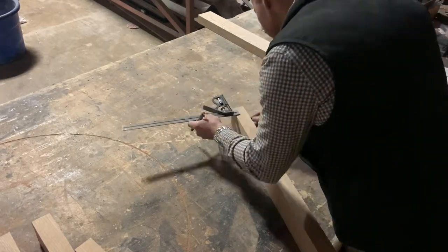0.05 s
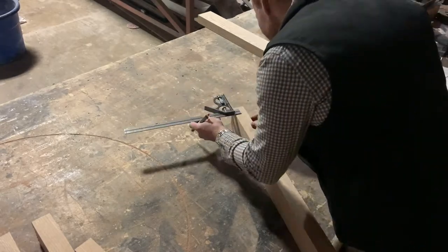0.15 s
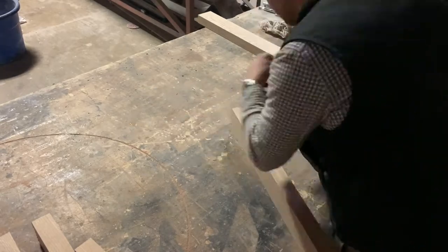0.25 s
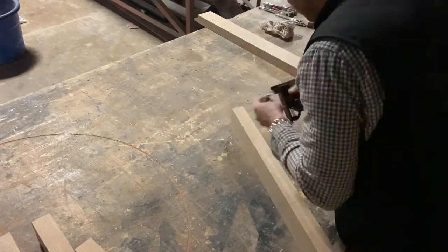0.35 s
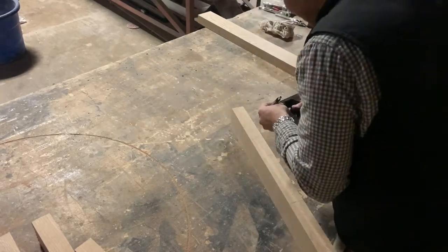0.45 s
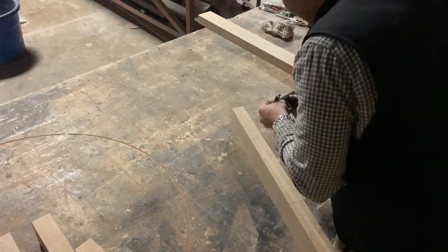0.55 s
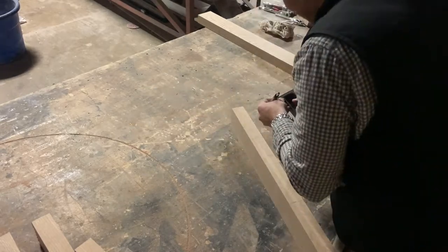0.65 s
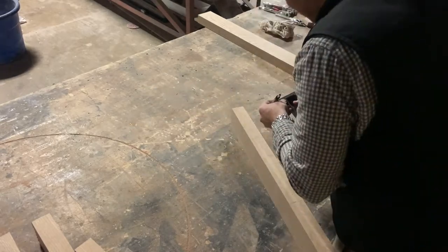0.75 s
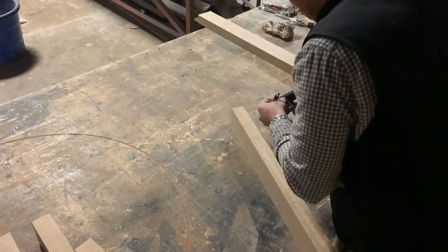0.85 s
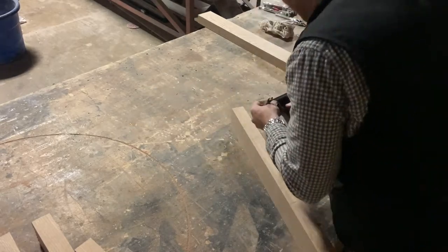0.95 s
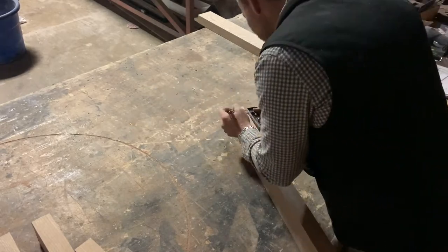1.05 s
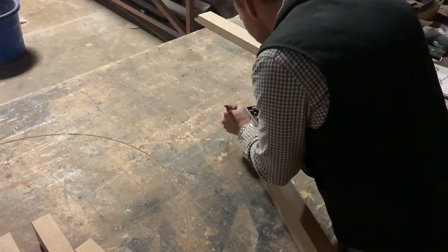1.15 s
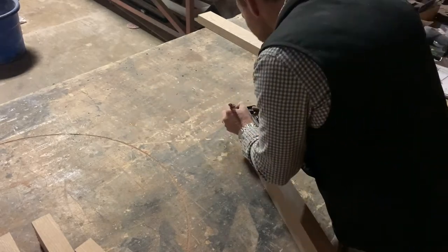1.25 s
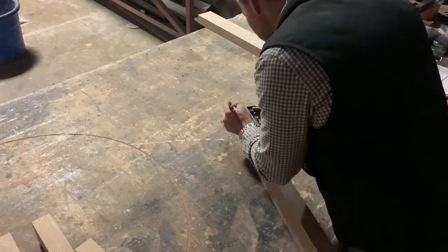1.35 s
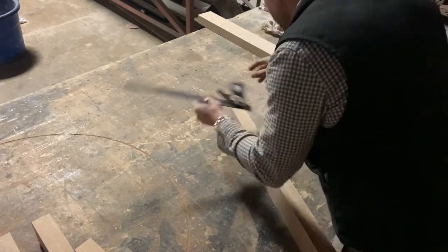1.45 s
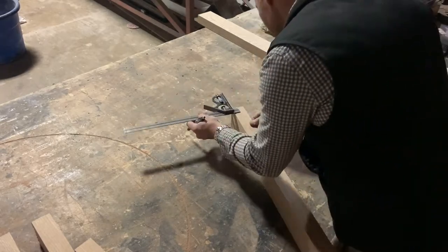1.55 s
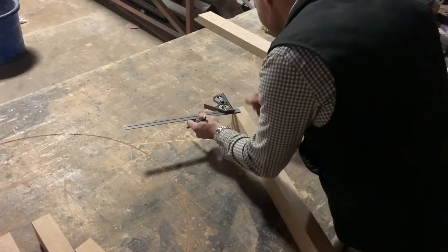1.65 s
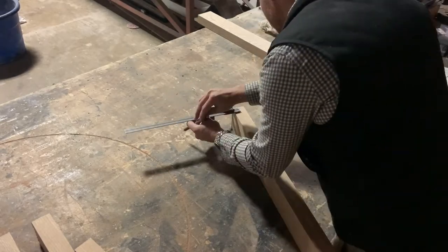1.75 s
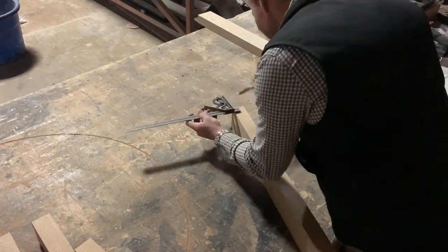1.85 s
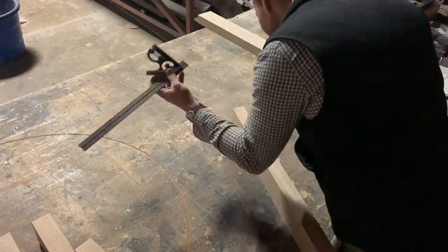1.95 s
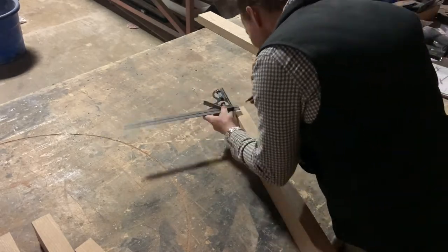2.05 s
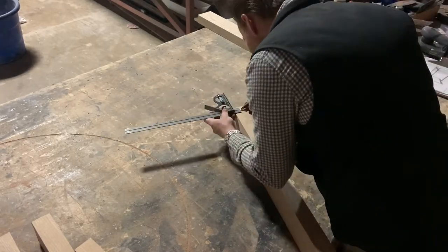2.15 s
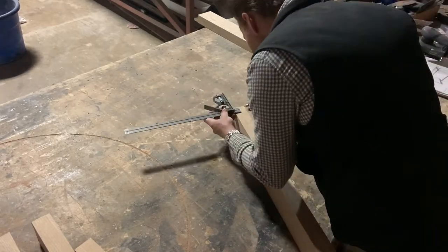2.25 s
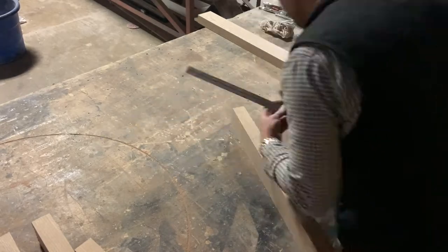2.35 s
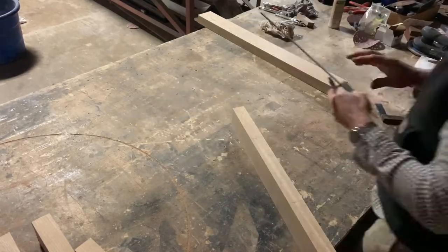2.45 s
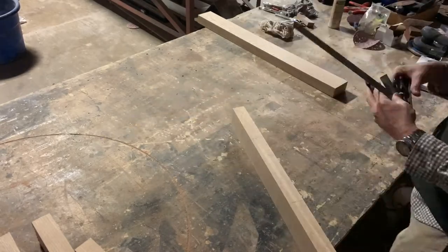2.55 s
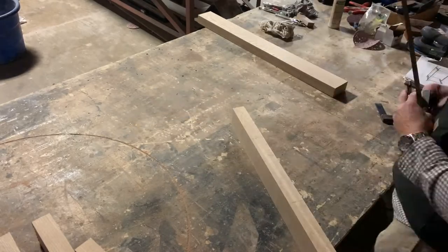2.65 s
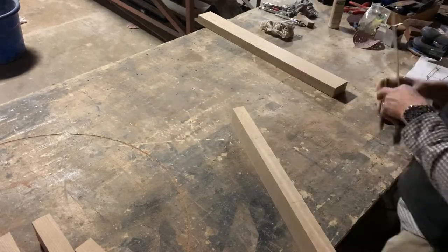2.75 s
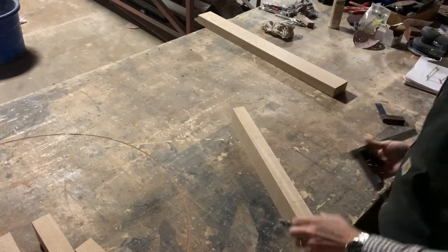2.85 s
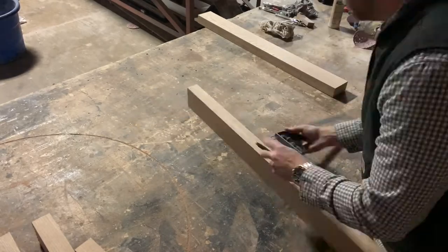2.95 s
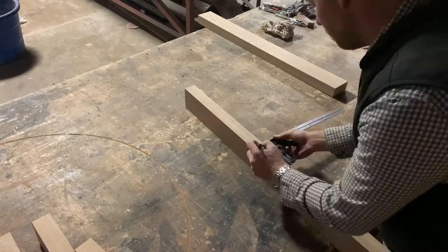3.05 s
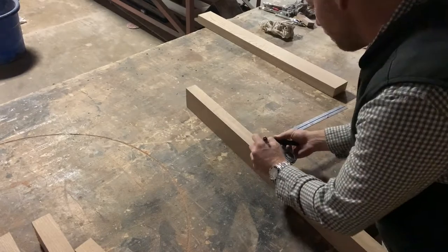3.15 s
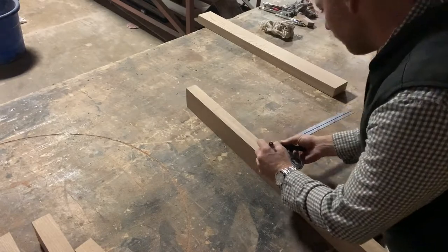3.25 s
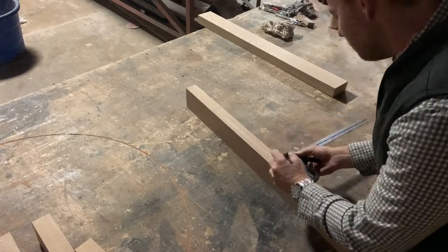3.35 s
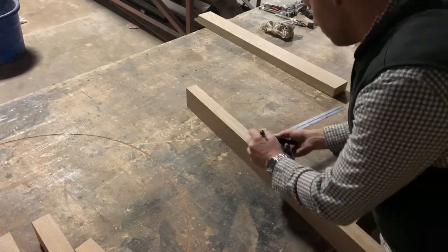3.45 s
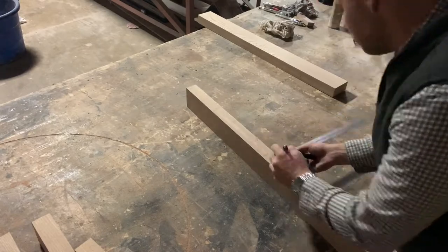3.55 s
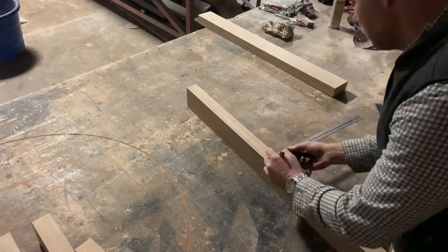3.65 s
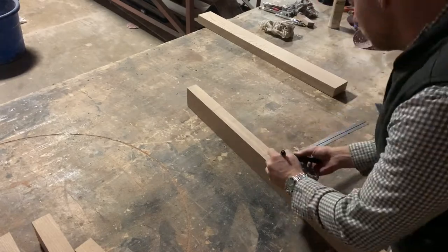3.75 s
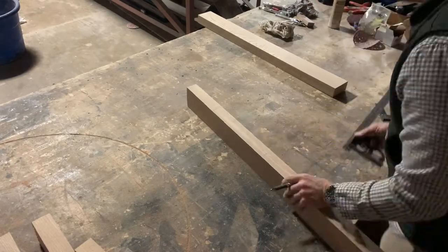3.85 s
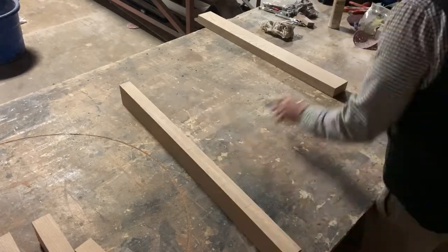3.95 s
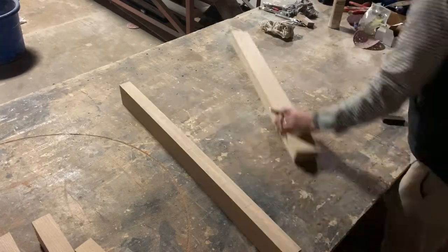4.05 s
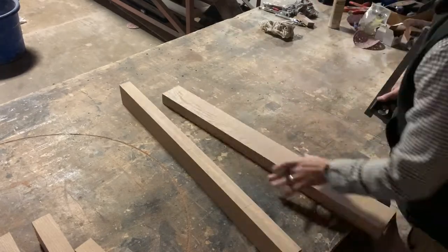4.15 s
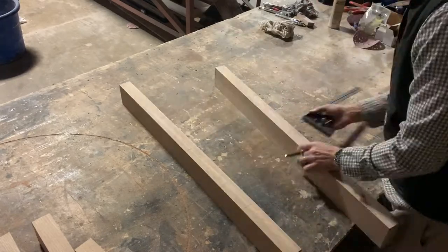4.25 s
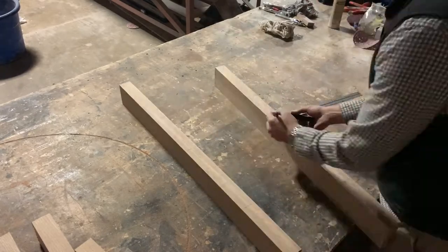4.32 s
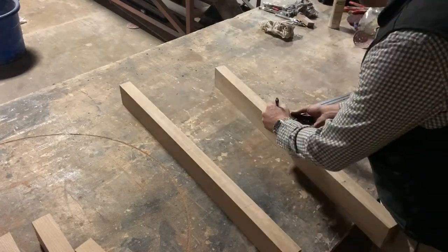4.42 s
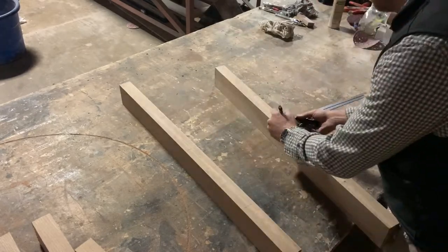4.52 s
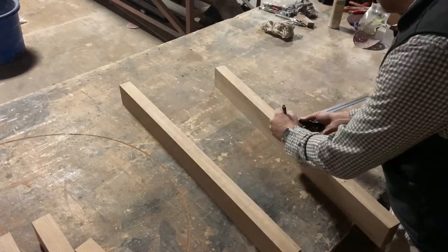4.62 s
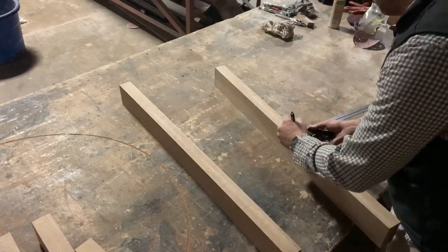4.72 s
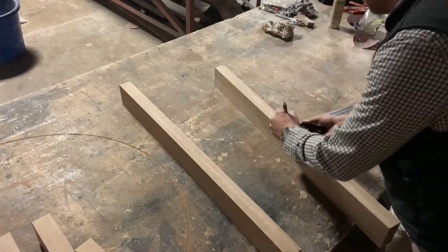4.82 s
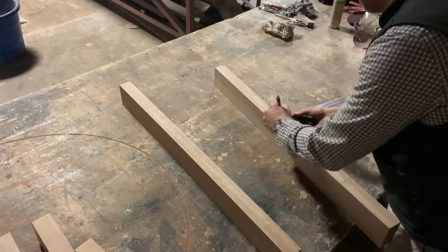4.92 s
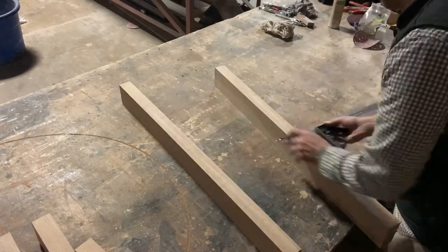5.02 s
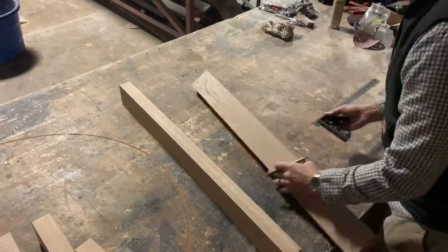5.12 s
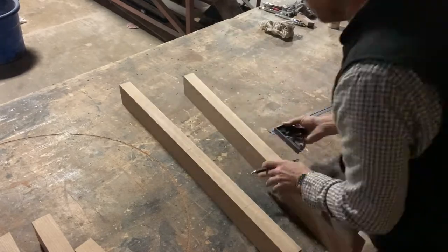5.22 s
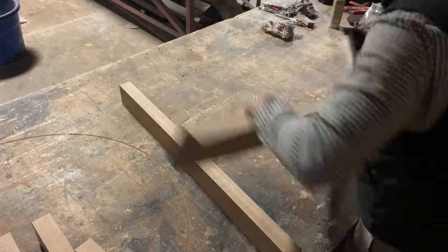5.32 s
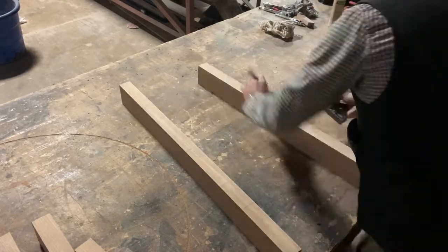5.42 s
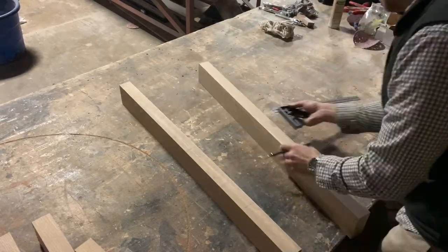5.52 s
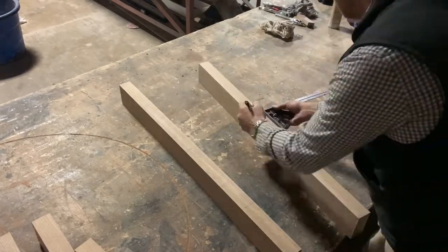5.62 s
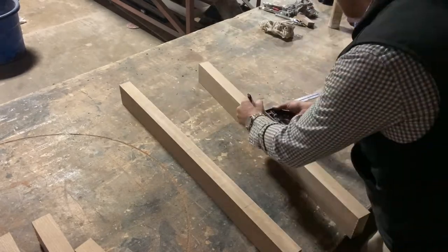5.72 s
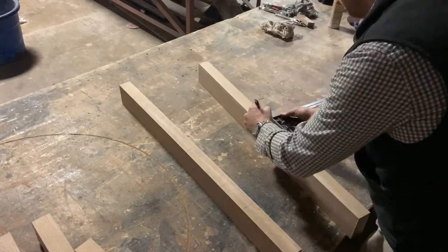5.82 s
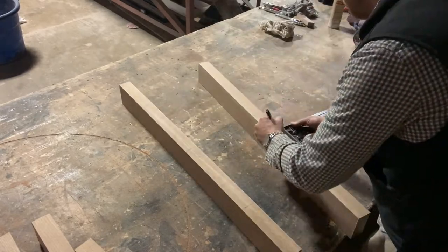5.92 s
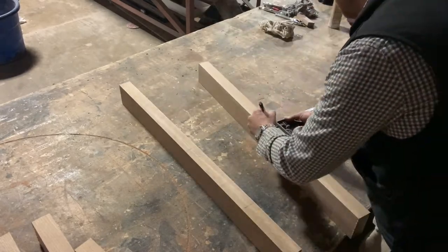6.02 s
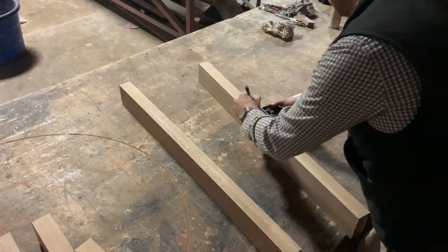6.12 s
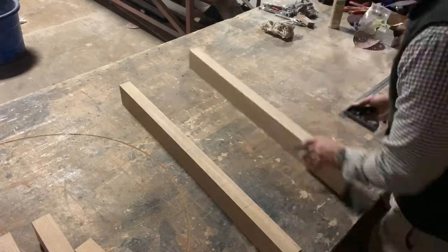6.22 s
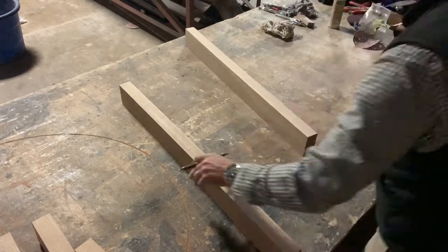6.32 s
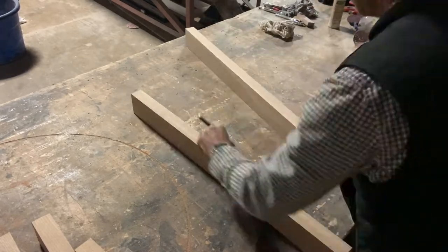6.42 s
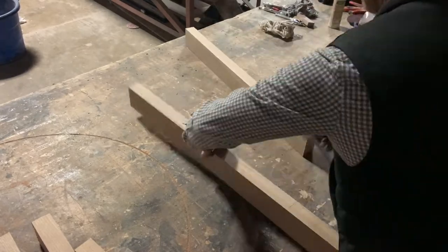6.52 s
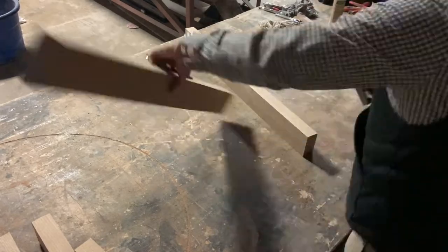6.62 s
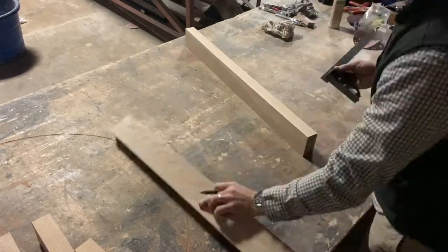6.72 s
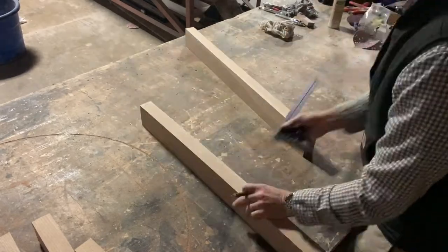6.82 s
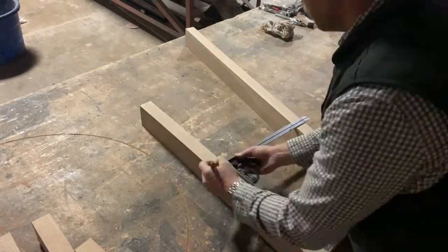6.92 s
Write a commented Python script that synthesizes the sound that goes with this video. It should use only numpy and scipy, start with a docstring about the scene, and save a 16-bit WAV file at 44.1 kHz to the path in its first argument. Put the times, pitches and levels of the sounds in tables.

```python
"""Far machines hum throughout in a large shop. At a workbench a steel square ticks, and ticks again more
sharply after a second. Near two seconds a distant motor whines up twice and runs down, while the square
starts to slide along an edge, singing by friction. From three seconds on boards are dragged, rasping
over grit, and from four they are knocked down in clusters, each impact ringing the modes of the wood,
with more ticks and slides of the square between."""
import sys
import numpy as np
from scipy import signal
from scipy.fft import rfft, irfft, next_fast_len
from scipy.io import wavfile

SR = 44100
rng = np.random.default_rng(int(sys.argv[2]) if len(sys.argv) > 2 else 0)


def dump_mix(stems):
    """Bounce the given channels to the path in sys.argv[1] as a 16-bit WAV at rate SR."""
    frames = np.atleast_2d(stems).T  # one column per channel
    limited = np.clip(frames, -1, 1)  # hard clip at full scale
    pcm = np.round(limited * 32767).astype(np.int16)
    wavfile.write(sys.argv[1], SR, pcm)


N = 307818

# Noise of far machines. Each row: frequency in Hz, relative spectral density in dB.
MACHINE_SPECTRUM = [(76, -75), (130, -59.5), (227, -26.5), (351, -12.5), (464, -5.5), (637, 1.5),
                    (690, 1.5), (911, -3), (967, -7.5), (1180, -8.5), (1720, -12.5), (1980, -16.5),
                    (2510, -19.5), (3380, -22.5), (15000, -55.5)]
# Coherence of that noise. Each row: frequency in Hz, left-right correlation.
COHERENCE = [(60, 0.84), (180, 0.47), (550, 0.9), (1650, 0.8), (4970, 0.12), (15000, -0.59)]
# Machine hum. Each row: frequency in Hz, level in dB.
HUM_LINES = [(190, -87), (237, -79), (281, -79), (329, -77), (421, -76), (469, -67), (668, -67), (959, -63),
             (1104, -76), (1377, -77), (1690, -72)]
# Frequencies in Hz at which the spectrum of an impact is given.
IMPACT_HZ = [800, 2500, 6000, 9000, 13000]
# Ticks of the square. Each row: start in seconds, level at 6 kHz in dB, then thud (800 Hz),
# ring (9 kHz) and snap (13 kHz) in dB relative to it.
SQUARE_TICKS = [(0.053, -59, 14, -3, 15), (0.0711, -40.5, 7, -9, -20), (1.051, -36, 0.5, 0.5, -18),
                (1.0727, -42, -10, -10, -25), (1.158, -55, -15, -19, -20), (1.26, -71, -15, 4, 0),
                (1.499, -42, 10, 3, -4), (1.835, -59.5, 16.5, -13, -12), (1.8971, -29, 2, 11, -19),
                (2.0038, -43, 0, 2.5, 4), (2.0768, -49, 9.5, 8.5, -9), (2.2062, -52.5, 0, 10.5, -40),
                (2.7804, -53, -4, -8, -19), (2.812, -55, 2, -4, 5), (3.0114, -31.5, -10, -22, -2),
                (3.487, -52, -4, -13, -8), (3.6175, -28.5, -14.5, -4.5, 2), (3.6237, -23.5, -9.5, -22, 2),
                (3.6612, -42.5, -12, -10, -8), (4.0415, -40.5, 0, 6, 16), (4.294, -47, 8, -6, -18),
                (4.3, -31.5, -12, -29, -25), (4.333, -53.5, 5.5, 0, -17), (4.4204, -60, 2, -12, -18),
                (4.47, -61.5, 2, -12.5, -6), (4.5962, -50, -3, -24, -22), (5.0426, -63.5, 8.5, 3, 4),
                (5.5626, -43.5, 6, -13, -14), (5.5871, -41.5, -5, -9, -4), (6.3511, -55, -6, 9, 2),
                (6.512, -66, -10, 1, 17), (6.883, -63, -12, 4, 14), (6.905, -69, -10, -2, 12)]
# Modes of the steel. Each row: frequency in Hz, level in dB, 60 dB decay time in seconds.
STEEL_MODES = [(2070, -4, .012), (2600, -4, .01), (3600, -3, .015), (5050, 1, .012), (5400, 0, .01),
               (7200, -4, .008), (8600, 2, .012), (9450, 1, .012), (9850, -2, .01), (13300, -4, .006),
               (14600, -4, .006)]
# Boards striking the bench; the light first row is heard as a tick. Each row: start in seconds,
# level at 800 Hz in dB, then middle (2.5 kHz) and treble in dB relative to it.
BOARD_KNOCKS = [(1.027, -32.5, 0.5, -2), (3, -46.5, 7, 0), (3.886, -24.5, -19, -24),
                (4.095, -12.5, -3.5, -14), (4.122, -14.5, 4.5, 7), (4.212, -28, -25, -14),
                (4.231, -15, -7, -13.5), (5.082, -9.5, 2.5, 2.5), (5.156, -13.5, -4.5, -8),
                (5.376, -24, -27.5, -26.5), (5.405, -7, 0, 0), (5.493, -29, -7.5, -10.5),
                (5.511, -21, -3.5, -31), (6.231, -16, -14.5, -27.5), (6.37, -23.5, -22.5, -29),
                (6.541, -40, -21, -21), (6.573, -34, -7.5, -22), (6.597, -25, -16, -26),
                (6.61, -34, -10.5, -20), (6.696, -17.5, -7, -11), (6.709, -11.5, -6.5, -17),
                (6.717, -22, -13, -14), (6.741, -6, -13, -1.5), (6.807, -8.5, -11.5, -18.5),
                (6.889, -38.5, -4, -2)]
# Offsets in dB to a knock's treble at 6, 9 and 13 kHz.
KNOCK_TREBLE_DB = [0.5, 1, -7]
# Modes of a board. Each row: frequency in Hz, level in dB, 60 dB decay time in seconds.
WOOD_MODES = [(503.6, -13, 0.01), (665, -4, 0.09), (829, 7, 0.033), (913, -1.5, 0.037), (1122, -5.5, 0.026),
              (1347, -1, 0.013), (1836, -0.5, 0.024), (2300, -2, 0.013), (2660, -2.5, 0.0078),
              (3090, -2.5, .02), (3433, -6.5, .02), (3693, -3, 0.012)]
# The motor's two runs. Each row: time in seconds, shaft speed in Hz, whine level in dB.
FIRST_RUN = [(1.84, 84.3, -47), (1.886, 88.8, -38.5), (1.94, 98, -52.5), (2.0, 105.9, -42.5),
             (2.136, 129.2, -53.5), (2.19, 132.4, -49)]
SECOND_RUN = [(2.17, 109.7, -49.5), (2.22, 114.2, -40.5), (2.302, 119.3, -45.5), (2.374, 131.3, -39.5),
              (2.434, 131.9, -45.5), (2.5, 134.2, -41.5), (2.698, 146.5, -50), (2.8, 137, -46),
              (2.844, 124.4, -52), (2.91, 100, -51)]
# Further shaft harmonics. Each row: order, dB relative to order 8 at full speed, dB lost per Hz slower.
SHAFT_HARMONICS = [(3, 7, 1), (5, -2.5, 0.24), (6, -13.5, 0), (13, -27, 0.5), (16, -28.5, 0)]
# The square sliding. Each row: peak time, rise and fall in seconds, then levels in dB of the
# high song (9.8 kHz), low song (5.3 kHz) and rustle.
SQUARE_SLIDES = [(1.872, 0.015, 0.015, -76, -75, -64), (2.42, 0.071, .04, -93, -72.5, -71.5),
                 (2.52, 0.044, 0.06, -94, -76.5, -71), (2.61, 0.032, 0.063, -81, -68.5, -71.5),
                 (3.17, 0.056, .1, -91, -77, -82), (3.31, 0.12, 0.083, -93, -72, -75.5),
                 (3.43, .05, 0.087, -95, -68, -70.5), (3.49, 0.033, 0.033, -89, -66, -61.5),
                 (3.55, .06, 0.037, -88, -62, -66), (3.74, 0.034, 0.037, -84, -68, -79),
                 (3.806, .02, 0.037, -90, -76, -61), (4.088, 0.04, 0.023, -44, -41, -56),
                 (4.35, .02, 0.036, -74, -82, -90), (4.48, .06, .1, -75, -75, -84.5),
                 (4.66, .1, 0.073, -71, -70.5, -91), (4.726, .01, .03, -89, -85, -83.5),
                 (4.87, 0.14, 0.07, -76, -73.5, -85), (4.95, 0.071, .1, -70, -66, -88.5),
                 (5.84, 0.12, 0.11, -70, -83.5, -91), (6.065, 0.11, .09, -70.5, -78, -88),
                 (6.5, 0.044, .03, -74, -68.5, -72), (6.915, 0.029, 0.034, -78.5, -66.5, -69.5)]
# Boards dragged. Each row: peak time, rise and fall in seconds, then rumble, rasp and hiss in dB.
BOARD_DRAGS = [(2.928, 0.039, 0.04, -39, -46, -44), (3.91, 0.047, 0.047, -30.5, -49.5, -42),
               (4.04, 0.028, 0.068, -28, -43, -46), (4.09, 0.046, 0.04, -26.5, -38, -37),
               (4.222, .04, 0.018, -36.5, -50.5, -50), (4.3, 0.028, .025, -59.5, -47, -57.5),
               (5.3, .055, 0.074, -32.5, -43, -46.5), (5.35, .04, .05, -33, -50, -52),
               (5.384, .025, 0.017, -31.5, -63.5, -57), (5.505, .035, 0.047, -39, -43.5, -52),
               (6.245, .045, 0.045, -29.5, -37.5, -39.5), (6.378, 0.023, 0.033, -33, -53, -44.5),
               (6.545, .015, 0.03, -44.5, -62, -61.5), (6.595, 0.032, 0.027, -30.5, -47, -43),
               (6.885, 0.025, 0.035, -55, -51.5, -60)]
# Contact noise of a drag. Each row: frequency in Hz, relative spectral density in dB.
CONTACT_SPECTRUM = [(240, -47), (400, -16.5), (777, 10), (1930, -31.5), (3750, -15.5), (4310, -24.5),
                    (5960, -14), (9610, -6), (16000, -33.5)]
# A drag shakes the square: high song, low song and rustle in dB relative to the drag's hiss column.
SHAKEN_DB = [-13, -16, -8.5]
# Wood sticking and slipping. Each row: peak time, rise and fall in seconds, level in dB.
WOOD_SQUEAKS = [(3.917, .03, .03, -52.5), (5.312, .03, .05, -48.5), (5.35, .05, 0.043, -51.5)]
# Reverberation. Each row: frequency in Hz, 60 dB decay time in seconds, energy in dB, side re mid in dB.
ROOM_DECAY = [(300, 0.74, -33.5, -2.5), (780, 0.17, -14, -13.5), (2570, 0.13, -11.5, -7.5),
              (5800, 0.27, -25, 6.5), (14000, 0.28, -24, 0.5)]
# Phase between the microphone's ports. Each row: frequency in Hz, lead of the left in radians.
PORT_LEAD = [(0, 0), (3530, 0.47), (5860, 1.48), (7920, 1.08), (11200, 1.3), (11700, -2.5), (13900, 1.8),
             (16500, 1)]
# Response of the microphone in its housing. Each row: frequency in Hz, gain in dB.
MIC_RESPONSE = [(150, -39), (300, -27.5), (500, -7), (3600, -0.5), (4300, -2.5), (5200, -0.5), (7900, -2.5),
                (8700, 1), (9200, 3), (9700, 0), (11000, -5), (13300, -3), (14700, -5), (15300, -1.5),
                (16500, -14.5)]

FULL_SPEED_HZ, CUTOFF_HZ = 146, 16900
MACHINES_DB, SWAY_DB, HISS_DB = -56, -2, -85


def amp(db):
    """Decibels express an amplitude ratio logarithmically."""
    return 10 ** (np.asarray(db) / 20)


def rms_one(x):
    """Normalisation to unit mean power."""
    return x / np.sqrt(np.mean(x ** 2) + 1e-20)


def at_hz(points, hz, column=1):
    """Interpolation of a spectrum table over log frequency."""
    points = np.array(points)
    return np.interp(np.log(hz), np.log(points[:, 0]), points[:, column])


def drift(rate_hz):
    """Low-passed noise gives a slow random modulation of unit spread."""
    r = np.exp(-80 * np.pi * rate_hz / SR)
    slow = signal.lfilter([1], [1, -2 * r, r * r], rng.standard_normal(N // 40 + 2002))[2000:]
    return np.interp(np.arange(N) / 40, np.arange(len(slow)), rms_one(slow))


def ring(x, hz, t60):
    """A damped resonator answers each impulse with a decaying sine."""
    r, w = amp(-60 / (t60 * SR)), 2 * np.pi * hz / SR
    return signal.lfilter([0, np.sin(w)], [1, -2 * r * np.cos(w), r * r], x + 1e-18)


def bands(x, low_hz=100):
    """A half-octave filter bank yields centres and bands; alternating signs smooth their sum."""
    edges = 50 * 2 ** np.arange(0, 8.6, .5)
    edges = edges[edges >= low_hz]
    for k, (low, high) in enumerate(zip(edges, edges[1:])):
        sos = signal.butter(2, [low, high], "band", fs=SR, output="sos")
        yield np.sqrt(low * high), (-1) ** k * signal.sosfilt(sos, x)


def far_machines():
    """Distant machines form a partly coherent noise field, with narrow hum resonances and faint hiss."""
    noise, common_drift, size = 0, drift(1.8), next_fast_len(N)
    colour = amp(at_hz(MACHINE_SPECTRUM, np.linspace(1, SR / 2, size // 2 + 1)))
    white = rng.standard_normal((2, size))
    for hz, (mid, side) in bands(irfft(rfft(white) * colour, size)[:, :N]):
        alike = np.clip(at_hz(COHERENCE, hz), -.5, 1)
        gain = amp(.6 * common_drift + .7 * drift(10))
        noise += gain * (np.sqrt(1 + alike) * mid + np.sqrt(1 - alike) * side * [[1], [-1]])
    hum = sum(amp(db) * rms_one(ring(white[k % 2, :N], hz, t60=.6))
              for k, (hz, db) in enumerate(HUM_LINES))
    hum = signal.sosfilt(signal.butter(4, 170, "high", fs=SR, output="sos"), hum)
    hiss = signal.sosfilt(signal.butter(3, [6000, 14500], "band", fs=SR, output="sos"), white[:, :N])
    return amp(MACHINES_DB + SWAY_DB * drift(.6)) * rms_one(noise) + hum + amp(HISS_DB) * rms_one(hiss)


def impacts(times, band_db, modes, ring_db, snap_db, crack_db, crack_t60):
    """An impulse excites every mode at a random strength, with a brief snap and longer crack of noise."""
    starts, out = np.round(times * SR).astype(int), np.zeros(N)
    scatter_db = 3.5 * rng.standard_normal((len(starts), len(modes)))
    lag = lambda hz: int(1.2 * SR / hz)   # lows build up about a cycle after the treble
    colour = lambda hz: np.array([np.interp(np.log(hz), np.log(IMPACT_HZ), row) for row in band_db])
    for k, (hz, mode_db, t60) in enumerate(modes):
        clicks = np.zeros(N)
        clicks[starts + lag(hz)] = amp(colour(hz) + mode_db + ring_db + scatter_db[:, k]) * (-1) ** k
        out += ring(clicks, hz, t60)
    for hz, noise in bands(rng.standard_normal(N), low_hz=390):
        clicks = np.full(N, 1e-18)
        clicks[starts + lag(hz)] = amp(colour(hz))
        decay = lambda t60: signal.lfilter([1], [1, -amp(-60 / (t60 * SR))], clicks)
        snap = amp(snap_db) * decay(0.0023 + 1.5 / hz)
        crack = amp(crack_db) * decay(crack_t60 * (1000 / hz) ** 0.18)   # lows last longer
        out += (snap + crack) * rms_one(noise)
    return out


def square_ticks():
    """Light contacts set the square's head and blade in brief, high free vibration."""
    times, db, thud, high, top = np.transpose(SQUARE_TICKS)
    middle = thud - 6.5
    band_db = db[:, None] + np.c_[thud, middle, np.zeros_like(db), high, top]
    return impacts(times, band_db, STEEL_MODES, ring_db=-7.5, snap_db=-10, crack_db=-12.5, crack_t60=.045)


def board_knocks():
    """Impact on the bench excites a board's strongly damped modes."""
    times, db, middle, treble = np.transpose(BOARD_KNOCKS)
    band_db = db[:, None] + np.c_[np.zeros_like(db), middle, treble[:, None] + KNOCK_TREBLE_DB]
    return impacts(times, band_db, WOOD_MODES, ring_db=-7.5, snap_db=-6, crack_db=-17.5, crack_t60=.078)


def in_time(rows, outside=-150.):
    """Linear interpolation gives a run's shaft speed and level at every sample."""
    times, *columns = np.transpose(rows)
    return [np.interp(np.arange(N) / SR, times, column, outside, outside) for column in columns]


def motor():
    """A rotor radiates harmonics of its shaft speed; the long way through the shop makes each flutter."""
    def harmonic(shaft_hz, level_db, order):
        gain = signal.lfilter([.002], [1, -.998], amp(level_db + 5.5 * drift(35)))   # soft start and stop
        turns = np.cumsum(np.maximum(shaft_hz, 0) * (1 + 0.00733 * drift(42))) / SR
        return gain * np.sin(2 * np.pi * order * turns)
    first = harmonic(*in_time(FIRST_RUN), order=8)
    hz, whine_db = in_time(SECOND_RUN)
    second = harmonic(hz, whine_db, order=8)
    for order, db, loss in SHAFT_HARMONICS:
        second += harmonic(hz, whine_db + db - loss * (FULL_SPEED_HZ - hz), order)
    return first + second


def strokes(rows, fade_db=26.5, arch_power=1.52):
    """Amplitude envelopes of rubbing: arches, fade_db down one rise before and one fall after the peak."""
    t, out = np.arange(N) / SR, np.zeros((len(rows[0]) - 3, N))
    for peak, rise, fall, *levels in rows:
        span = slice(int((peak - 1.6 * rise) * SR), int((peak + 1.6 * fall) * SR))
        away = np.where(t[span] < peak, (peak - t[span]) / rise, (t[span] - peak) / fall)
        out[:, span] += amp(np.array(levels)[:, None] - fade_db * away ** arch_power)
    return out


def grit(per_s, spread_db):
    """Sliding friction is a dense random train of unequal micro-impacts."""
    sizes = amp(spread_db * np.minimum(rng.exponential(1, N), 4)) * rng.choice([-1, 1], N)
    return rms_one(sizes * (rng.random(N) < per_s / SR))


def square_slides(friction):
    """Forced vibration: rubbed, or shaken by a dragged board, the blade sings and rustles."""
    shaken = strokes(BOARD_DRAGS)[2] * amp(SHAKEN_DB)[:, None]
    high_song, low_song, rustle = (strokes(SQUARE_SLIDES) + shaken) * amp(3.5 * drift(40))
    mode = lambda hz, t60: rms_one(ring(friction, hz, t60))
    song = low_song * mode(5300, .007) + high_song * (mode(9800, .009) + amp(-16) * mode(8700, .008))
    hiss = signal.sosfilt(signal.butter(2, [3500, 15500], "band", fs=SR, output="sos"), friction)
    return song + rustle * (rms_one(hiss) + amp(3) * mode(14400, .003))


def board_drags():
    """Grit under a sliding board drives its modes and radiates broadband contact noise."""
    rumble, rasp, hiss = strokes(BOARD_DRAGS) * amp(1.8 * drift(72))
    friction = grit(per_s=12000, spread_db=2.0)
    envelope = lambda hz: rumble if hz < 1500 else rasp if hz < 4500 else hiss * amp(5.5)
    modal = sum(amp(db) * rms_one(ring(friction, hz, t60)) * envelope(hz) for hz, db, t60 in WOOD_MODES)
    broad = sum(amp(at_hz(CONTACT_SPECTRUM, hz)) * band * envelope(hz)
                for hz, band in bands(friction, low_hz=390))
    return amp(-9.5) * modal + amp(0.5) * broad


def wood_squeaks(friction):
    """Stick-slip motion of the wood excites one narrow resonance."""
    return strokes(WOOD_SQUEAKS)[0] * rms_one(ring(friction, hz=3720, t60=0.061))


def through_room(x, wet_db):
    """Direct sound, out of phase at the two ports in the treble, sums with a tail decaying by band."""
    t, tail = np.arange(SR // 2) / SR, 0
    for hz, (mid, side) in bands(rng.standard_normal((2, len(t)))):
        t60, energy_db, side_db = (at_hz(ROOM_DECAY, hz, column=k) for k in (1, 2, 3))
        decay = amp(energy_db + wet_db - 60 * t / t60) / np.sqrt(SR * t60 / 14)
        tail += decay * (mid + amp(side_db) * side * [[1], [-1]])
    tail *= np.clip(t / 0.0062, 0, 1)   # reflections build up
    size = next_fast_len(N + len(t))
    hz = np.linspace(1, SR / 2, size // 2 + 1)
    direct = np.exp(.5j * at_hz(PORT_LEAD, hz) * [[1], [-1]])
    response = amp(at_hz(MIC_RESPONSE, hz)) * (direct + rfft(tail, size))
    return irfft(rfft(x, size) * response, size)[:, :N]


def scene():
    """Sources superpose; the distant motor is more reverberant than the nearby bench."""
    bench = board_knocks() + square_ticks() + board_drags()
    friction = grit(per_s=6000, spread_db=3.5)
    bench += square_slides(friction) + wood_squeaks(friction)
    return through_room(bench, wet_db=3) + through_room(motor(), wet_db=11) + far_machines()


def record(dry):
    """Soft saturation rounds the loudest peaks, and a steep low-pass cuts the top."""
    rounded = .6 * np.tanh(dry / .6)
    return signal.sosfilt(signal.cheby2(12, 70, CUTOFF_HZ, fs=SR, output="sos"), rounded)


dry = scene()
out = record(dry)
dump_mix(out)
```